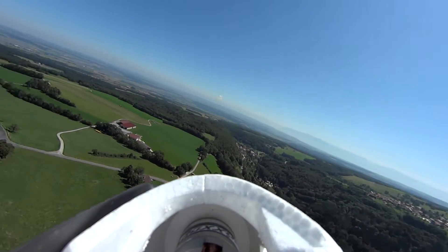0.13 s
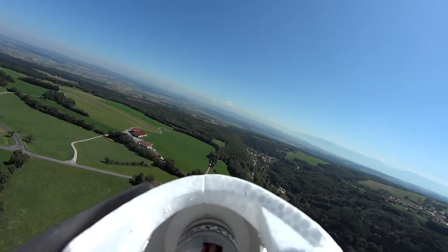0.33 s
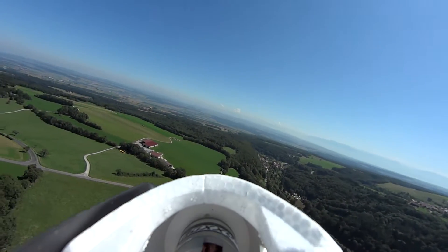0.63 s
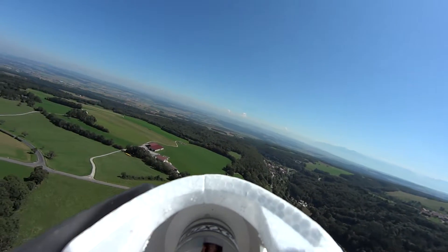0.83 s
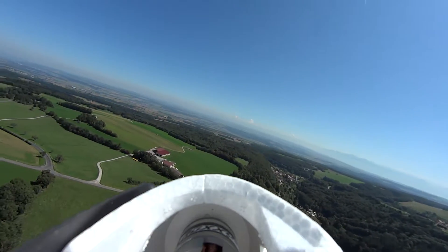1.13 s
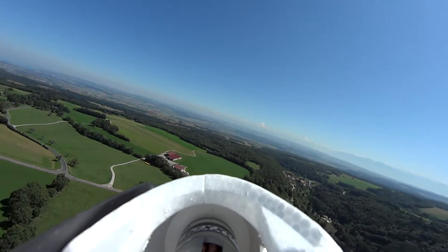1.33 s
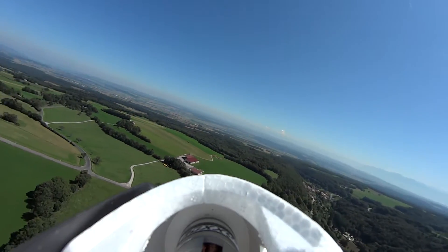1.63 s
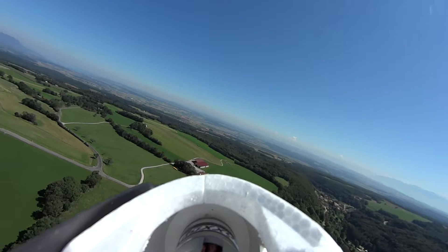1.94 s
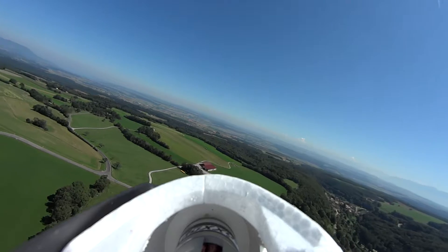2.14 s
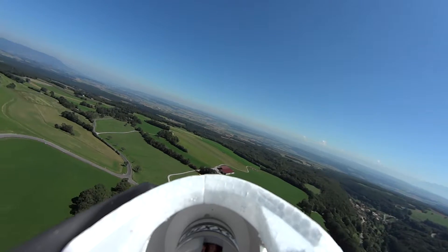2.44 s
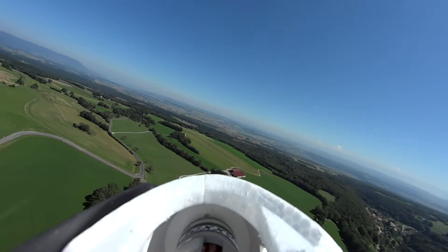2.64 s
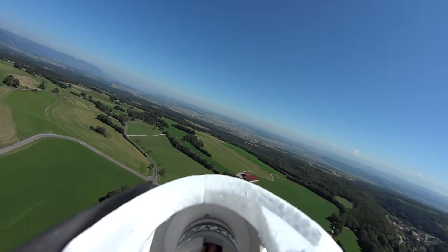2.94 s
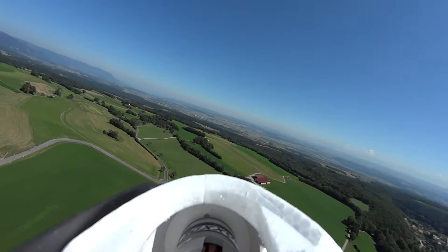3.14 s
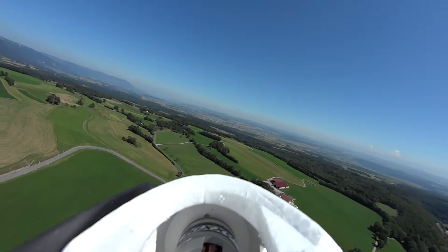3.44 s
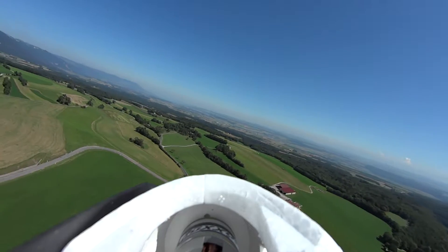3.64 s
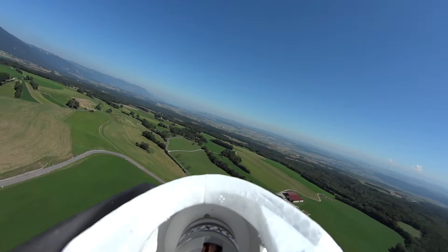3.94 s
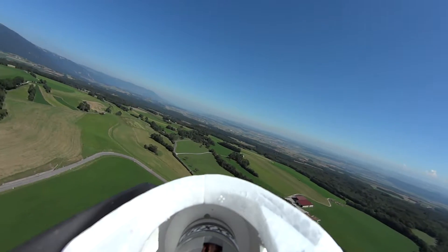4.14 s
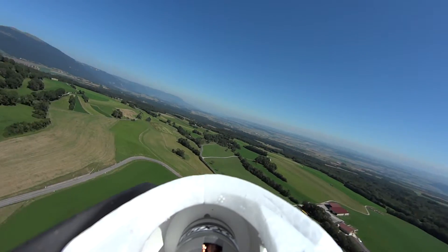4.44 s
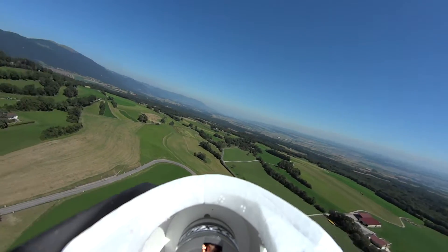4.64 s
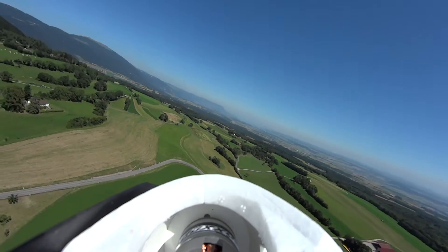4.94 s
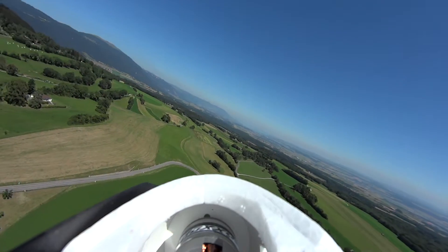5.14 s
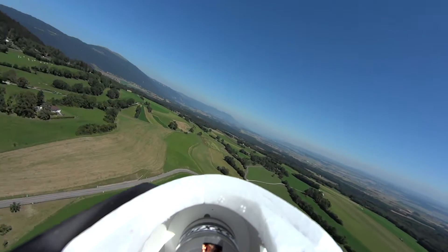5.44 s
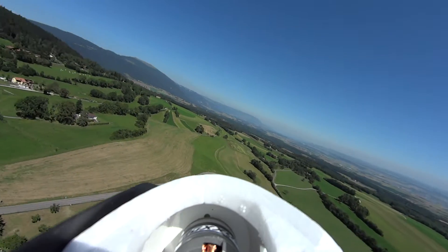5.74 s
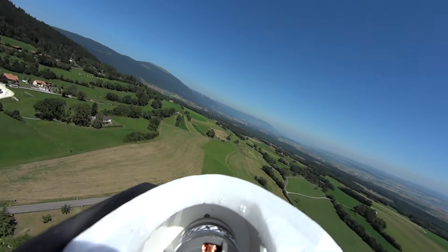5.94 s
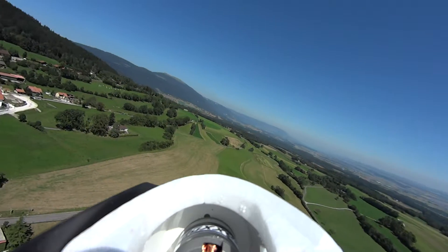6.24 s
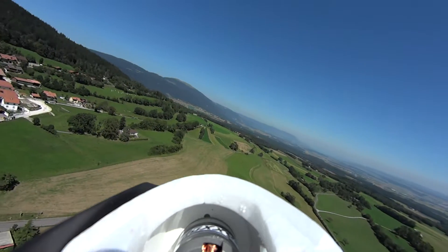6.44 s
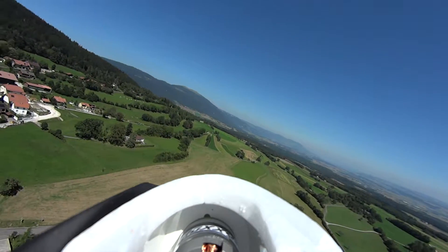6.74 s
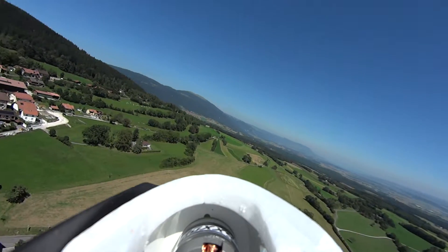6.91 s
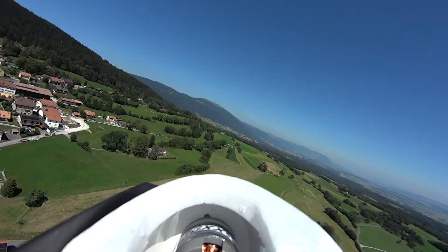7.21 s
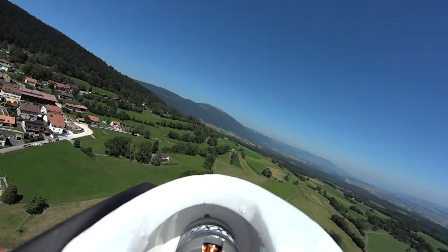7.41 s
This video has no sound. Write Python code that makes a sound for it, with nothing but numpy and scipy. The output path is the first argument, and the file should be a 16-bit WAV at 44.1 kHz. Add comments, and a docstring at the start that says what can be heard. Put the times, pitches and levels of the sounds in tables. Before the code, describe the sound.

For about seven and a half seconds there is only wind hitting a microphone on a gliding model aircraft, very close, loud and bass-heavy. Deep irregular thumps form an unbroken rumble, with a low churn above them, a fluttering muffled roar and a very thin, sputtering hiss. The left channel faces the stream and is fuller and brighter; the right is sheltered, duller and quieter. From 0 to 1.5 s the gusts are choppiest, with several hard overload ticks among faint crackle. The flow then steadies, dips briefly near 3.2 s, and surges again around 3.5 s with a few more ticks. Another lull comes near 4.9 s, clearer on the right. Buffeting continues unevenly, with scattered ticks around 5.6 to 5.9 s and 6.7 to 7.1 s. It thins near 7.3 s, ticks sharply at about 7.4 s, and swells again as it ends abruptly.

```python
"""On a gliding model aircraft, air rushes over the two microphone ports of a camera riding along.
Each port has its own turbulence, shaped from noise: deep buffeting, a low churn, a roar and a thin hiss.
The left port faces the stream; the right one is sheltered, duller and quieter.
High pressure crests overload the microphone with short snaps, a faint crackle and a few single ticks.
A limiter then holds the peaks of each channel, and the highest treble is cut away."""
import sys
import numpy as np
from scipy import signal
from scipy.fft import rfft, irfft, next_fast_len
from scipy.io import wavfile
from scipy.ndimage import uniform_filter1d, minimum_filter1d, map_coordinates

SR = 44100
rng = np.random.default_rng(int(sys.argv[2]) if len(sys.argv) > 2 else 0)


def log_audio(samples):
    """Write samples as a 16-bit WAV file to the path given in sys.argv[1]."""
    # one column per channel
    frames = np.atleast_2d(samples).T
    # limit to full scale, then quantise
    limited = np.clip(frames, -1, 1)
    pcm = np.round(limited * 32767).astype(np.int16)
    wavfile.write(sys.argv[1], SR, pcm)


N = 333837

# tone colour of the turbulence at each port, used for its shape inside each band:
# frequency_hz, density_db (per Hz)
LEFT_COLOUR = [(11, -8.5), (43, 0.6), (78, 0), (125, -6), (250, -13), (500, -23), (1000, -33.5),
               (1500, -42.5), (2100, -50), (2900, -55), (4400, -57), (7000, -68), (10000, -78.5)]
RIGHT_COLOUR = [(11, -11), (43, -3.5), (78, 0), (125, -7.5), (250, -16.5), (500, -30.5), (1000, -45),
                (1500, -55.5), (2100, -64.5), (2900, -66.5), (4400, -75.5), (7000, -85), (10000, -90)]
# eddies at each port, one row each for buffet, churn, roar and hiss:
# level_db (in the mean stream), follow_db_per_db (of airflow), drift_db (random)
LEFT_EDDIES = [(-7, 0.65, 0.32), (-16, 1, 0.07), (-26.5, 1, 0), (-49, 1.14, -0.04)]
RIGHT_EDDIES = [(-12, 0.93, .2), (-22, 1, .2), (-38.5, 0.99, .3), (-70, .9, .5)]
# airflow at the exposed left port, with gusts early on and lulls near 3.2, 4.9 and 7.3 s:
# time_s, flow_db (about its mean)
LEFT_FLOW = [(0.02, -0.0), (0.3, 0.3), (0.36, 3.7), (0.56, -0.9), (0.7, 3.6), (0.76, 0.4), (0.88, 2.4),
             (0.96, -1.9), (1.1, 1.4), (1.26, -1.1), (1.42, 1.1), (1.82, 0.5), (1.9, 2.0), (2.02, -2.1),
             (2.1, 0.6), (2.22, -0.8), (2.3, 1.5), (2.58, 0.2), (3.06, -0.8), (3.1, -0.1), (3.2, -3.3),
             (3.53, 1.6), (3.59, -1.2), (3.67, 1.7), (3.81, 0.1), (3.91, 1.0), (3.95, -1.0), (4.09, 0.9),
             (4.19, -0.3), (4.21, 1.4), (4.51, -1.1), (4.61, 1.5), (4.93, -2.9), (5.13, 0.2), (5.17, -1.6),
             (5.37, 0.6), (5.41, -2.7), (5.53, 0.7), (5.73, -0.9), (5.79, 0.4), (5.99, -1.2), (6.13, 0.5),
             (6.31, -0.7), (6.37, 0.5), (6.53, -1.6), (6.75, 1.5), (6.85, -1.3), (6.97, 1.6), (7.27, -3.5),
             (7.55, 3.7)]
# airflow at the sheltered right port, which swings wider: time_s, flow_db (about its mean)
RIGHT_FLOW = [(0.02, 6.1), (0.28, -2.3), (0.4, 4.4), (0.48, -0.7), (0.88, 0.6), (1.0, -2.4), (1.1, 2.3),
              (1.16, -1.6), (1.32, 3.0), (1.98, -2.0), (2.18, 1.3), (2.96, -1.6), (3.1, 1.8), (3.18, -1.6),
              (3.35, -2.2), (3.43, 2.5), (3.57, -2.5), (3.91, 1.9), (3.95, -0.4), (4.03, 2.1), (4.21, -1.7),
              (4.37, 3.6), (4.45, 0.1), (4.71, 3.5), (4.85, -5.5), (5.13, -0.2), (5.19, -5.2), (5.35, 1.5),
              (5.43, -1.7), (5.61, 2.3), (5.89, -0.5), (6.11, 0.8), (6.65, -2.1), (6.75, 0.6), (7.13, 1.7),
              (7.17, -3.3), (7.35, -3.6), (7.55, 4.4)]
# large eddies that make the buffeting thump or drop out briefly: centre_s, length_s, left_db, right_db
SWELLS = [(0.03, 0.05, 4.0, -1.5), (0.17, 0.05, 2.4, 2.5), (0.23, 0.05, -3.3, 1.8),
          (0.35, 0.05, -3.8, -1.4), (0.49, 0.05, 0.1, 4.0), (0.54, 0.05, 3.6, 2.2), (0.7, 0.05, -5.5, -0.4),
          (0.93, 0.07, 2.6, 1.3), (1.14, 0.05, 2.8, 0.3), (1.24, 0.05, 2.6, 1.4), (1.5, 0.05, 2.1, 0.1),
          (1.56, 0.05, -1.6, 4.4), (1.64, 0.05, 1.4, 3.2), (1.84, 0.05, 2.1, 1.3), (1.9, 0.05, -2.6, -0.5),
          (2.01, 0.07, 3.6, 0.6), (2.22, 0.07, 2.1, -2.7), (2.38, 0.05, -2.5, 1.2), (2.53, 0.05, 1.7, 3.5),
          (2.66, 0.07, -2.6, 1.5), (2.92, 0.07, 3.0, -3.9), (3.05, 0.05, 1.5, -6.9),
          (3.23, 0.05, -1.1, -4.5), (3.64, 0.07, -5.0, 1.9), (3.78, 0.07, 1.8, 1.5),
          (3.95, 0.05, 4.8, -0.5), (4.21, 0.05, -4.1, 3.0), (4.33, 0.05, 2.9, -0.7), (4.46, 0.1, 2.3, 2.8),
          (4.64, 0.05, -5.0, -1.2), (4.78, 0.05, -2.2, -0.3), (4.97, 0.05, -1.9, -3.6),
          (5.08, 0.05, 3.8, -1.5), (5.17, 0.05, 2.3, 2.3), (5.25, 0.05, -2.4, -2.3), (5.42, 0.1, 3.5, 1.2),
          (5.63, 0.05, 2.7, -3.8), (6.37, 0.15, -2.7, -0.8), (6.5, 0.05, -2.0, -2.1),
          (6.65, 0.05, 3.2, 1.8), (6.73, 0.05, -0.4, -3.9), (6.97, 0.05, -4.3, 1.2),
          (7.25, 0.07, -5.6, -3.5), (7.5, 0.05, -3.0, -3.3)]
# middling eddies that make the churn whoosh or thin out: centre_s, length_s, left_db, right_db
WHOOSHES = [(0.03, 0.05, -2.4, 0.7), (0.5, 0.07, -2.2, -1.2), (0.6, 0.05, 3.9, -0.1),
            (0.67, 0.05, -1.3, 4.8), (2.53, 0.05, 2.2, 2.6), (2.98, 0.05, 3.8, -0.2),
            (3.13, 0.1, -2.0, -0.6), (3.28, 0.1, 1.8, -0.6), (3.61, 0.1, -3.4, 0.5), (4.41, 0.07, 2.8, 0.5),
            (4.66, 0.05, 2.5, 1.3), (5.7, 0.05, 0.1, -4.1), (5.78, 0.07, -2.1, 1.3),
            (6.01, 0.05, -2.6, 0.6), (6.5, 0.1, -2.5, 0.9), (6.86, 0.07, 4.1, -3.0),
            (7.39, 0.05, 1.7, -2.8), (7.46, 0.05, -2.4, -2.8)]
# moments when the left roar is briefly louder, as in any uneven turbulence: centre_s
ROAR_LIFT_TIMES = [.232, .831, 1.13, 1.983, 2.951, 3.23, 3.694, 4.822, 5.954, 7.111]
# extra level of the left hiss, on top of what the airflow gives it: time_s, level_db
LEFT_HISS = [(0.02, -0.7), (0.12, 1.1), (0.46, -0.6), (0.6, 1.9), (0.7, -1.7), (0.82, 0.2), (1.82, -0.1),
             (1.9, -1.3), (2.02, 0.8), (2.3, -0.8), (3.24, 0.5), (3.39, -0.8), (4.17, 0.3), (4.37, -2.8),
             (4.49, -0.2), (4.85, -0.6), (4.99, 2.5), (5.09, -0.4), (6.03, 0.8), (6.21, -0.8), (6.55, 1.5),
             (6.61, -0.2), (7.43, 1.0), (7.55, -1.3)]
# single hard overload ticks: start_s, strength_db (relative to the common tick size), port (0 left, 1 right)
TICKS = [(0.07, -2.8, 1), (0.228, 7.8, 0), (0.39, 8.8, 0), (0.609, 7.8, 0), (0.627, 7.9, 0),
         (1.09, -3.2, 1), (1.217, 7.9, 0), (1.233, -10.0, 1), (1.321, -6.9, 1), (1.325, 7.2, 0),
         (1.341, 0.0, 1), (1.348, 8.9, 0), (1.519, -5.3, 1), (1.542, 7.6, 0), (2.425, 7.9, 0),
         (3.408, -7.2, 1), (3.692, 8.1, 0), (3.762, 7.9, 0), (4.098, 7.0, 0), (5.586, -9.6, 1),
         (5.645, -4.1, 1), (5.727, -1.5, 1), (5.79, -5.6, 1), (5.846, 8.2, 0), (6.682, 7.0, 0),
         (6.769, 8.0, 0), (6.917, -3.5, 1), (7.058, -1.3, 1), (7.095, -5.0, 1), (7.134, -6.4, 1),
         (7.416, 9.5, 0)]

BUFFET_HZ, CHURN_HZ, HISS_HZ = 150, 500, 2500  # top of the buffet, top of the churn, bottom of the hiss
TOP_HZ = 11100  # nothing is kept from here up
DRIFT_PER_S = 9  # random points a second in the drift of each eddy size
GUST_DB, GUSTS_PER_S = 0.08, 11  # gusts common to both ports
THUMP_DB, THUMPS_PER_S = 2.4, 45  # how deeply and quickly the buffeting breaks into thumps
SHARED = 0.2  # share of the buffeting power, before saturation, that both ports have in common
PORT_TOP = 1.9  # pressure at which the buffeting saturates a port (1 = full scale)
PATCH_DB = 1.2  # strength of the random patches in roar and hiss
LIFT_S, LIFT_DB = 0.012, 4  # width at half height, rise at the centre


def amp(db):
    """Turn decibels into a gain."""
    return 10 ** (np.asarray(db) / 20)


def unit(x):
    """Scale to an rms (average strength) of 1."""
    return x / np.sqrt(np.mean(x ** 2) + 1e-20)


def along(points, hz):
    """Join (Hz, value) points by straight lines on a log frequency axis."""
    f, v = np.transpose(points)
    return np.interp(np.log(hz + 1), np.log(f + 1), v)


def curve(rows):
    """Join (time, value) points by straight lines, giving one value per sample."""
    s, value = np.transpose(rows)
    return np.interp(np.arange(N) / SR, s, value)


def wobble(rate):
    """Draw a smooth random curve through `rate` random points a second."""
    points = rng.standard_normal(int(N * rate / SR) + 4)
    return map_coordinates(points, [np.arange(N) * rate / SR])


def bell(s, length):
    """Rise and fall smoothly around time s, `length` seconds wide at half height."""
    offset = 2 * (np.arange(N) / SR - s) / length
    return 0.5 ** np.minimum(offset ** 2, 20)


def filtered(x, response):
    """Multiply the spectrum of x by a response that depends on frequency."""
    m = next_fast_len(N + SR // 2)  # spare room at the end
    return irfft(rfft(x, m) * response(np.fft.rfftfreq(m, 1 / SR)), m)[..., :N]


def below(hz, edge_hz, order=8):
    """Share of power that a crossover passes under its edge."""
    return 1 / (1 + (hz / edge_hz) ** order)


def eddy_levels(flow_db, eddies):
    """Each size of eddy follows the airflow by its own power law and drifts a little by chance."""
    return [level_db + follow * flow_db + drift_db * wobble(DRIFT_PER_S)
            for level_db, follow, drift_db in eddies]


def passing_eddies(rows):
    """Each passing eddy lifts or lowers the level in a bell: dB at the left and right port."""
    return sum(np.outer([left_db, right_db], bell(s, length)) for s, length, left_db, right_db in rows)


def turbulence(colour, low_hz, high_hz, flutter_db):
    """One size range of eddies: fluttering noise, levelled to rms 1 over about a tenth of a second."""
    def response(hz):
        band_power = below(hz, high_hz) * (1 - below(hz, low_hz))
        return amp(along(colour, hz)) * np.sqrt(band_power)

    noise = unit(filtered(rng.standard_normal(N), response)) * amp(flutter_db)
    power = uniform_filter1d(noise ** 2, size=SR // 14)
    power = uniform_filter1d(power, size=SR // 14)
    return noise / np.sqrt(np.abs(power) + 1e-12)


def buffeting(level_db, colour, common):
    """The largest eddies push on the port in deep thumps; the pressure saturates smoothly."""
    own = turbulence(colour, 8.0, BUFFET_HZ, THUMP_DB * wobble(THUMPS_PER_S))
    swirl = np.sqrt(SHARED) * common + np.sqrt(1 - SHARED) * own
    push = amp(level_db) * swirl
    return push / (1 + (push / PORT_TOP) ** 4) ** (1 / 4)


def churning(level_db, colour, flutter_db):
    """Middling eddies churn between the buffeting and the roar."""
    return amp(level_db) * turbulence(colour, BUFFET_HZ, CHURN_HZ, 0.75 * flutter_db)


def roaring(level_db, colour, flutter_db):
    """Small eddies flutter quickly and blend into a roar."""
    return amp(level_db) * turbulence(colour, CHURN_HZ, HISS_HZ, flutter_db)


def hissing(level_db, colour, flutter_db, sputter_db):
    """The smallest eddies give a thin hiss that also sputters on its own."""
    spit_db = sputter_db * wobble(900) + 0.5 * wobble(25)
    return amp(level_db) * turbulence(colour, HISS_HZ, SR / 2, 0.5 * flutter_db + spit_db)


def patchy(x, depth_db):
    """Eddies of neighbouring sizes come and go: random gain in patches of pitch and time."""
    spectrum = signal.stft(x, nperseg=512)[2]
    # smoothing spreads each patch over a few hundred hertz and some tens of milliseconds
    field = uniform_filter1d(rng.standard_normal(spectrum.shape), size=7, axis=0)
    field = uniform_filter1d(field, size=7, axis=1)
    gain = unit(amp(depth_db * unit(field)))
    return signal.istft(spectrum * gain, nperseg=512)[1][:N]


def port(levels, colour, common, lumps_db, bursts_db, sputter_db):
    """Pressure at one port: large eddies buffet it, middling ones churn, small ones roar and hiss."""
    buffet_db, churn_db, roar_db, hiss_db = levels
    # smaller eddies come in bursts, so churn, roar and hiss partly flutter together
    flutter_db = lumps_db * wobble(70) + bursts_db * wobble(450)
    buffet = buffeting(buffet_db, colour, common)
    churn = churning(churn_db, colour, flutter_db)
    roar = roaring(roar_db, colour, flutter_db)
    hiss = hissing(hiss_db, colour, flutter_db, sputter_db)
    return buffet + churn + patchy(roar + hiss, PATCH_DB)


def snaps(times, sizes):
    """Overload snaps: the signal drops within a few samples and recovers over some two milliseconds."""
    t = np.arange(SR // 100) / SR
    drop = -(1 - np.exp(-t / 0.00004)) * np.exp(-t / 0.002)
    impulses = np.bincount(times, sizes, N)[:N]
    return signal.fftconvolve(impulses, drop)[:N]


def crackle(pressure, overload, size_db):
    """High pressure crests overload the microphone, mostly slightly, now and then hard."""
    crests = signal.find_peaks(pressure, height=overload, distance=SR // 300)[0]
    strength = rng.random(N)[crests] ** 2  # squaring makes small snaps the most common
    return snaps(crests, amp(size_db) * strength)


def ticks(size_db):
    """A few hard overloads stand out as single ticks, each at one port."""
    s, strength_db, side = np.transpose(TICKS)
    times = np.round(s * SR).astype(int)
    sizes = amp(strength_db + size_db)
    return np.array([snaps(times, sizes * (side == k)) for k in range(2)])


def roar_lifts():
    """Brief lifts of the left roar, as in any uneven turbulence: dB on top of its level."""
    return LIFT_DB * sum(bell(s, LIFT_S) for s in ROAR_LIFT_TIMES)


def scene():
    """The stream drives the exposed left port and the duller, quieter right port; large eddies span both."""
    gust_db = GUST_DB * wobble(GUSTS_PER_S)
    common = turbulence(LEFT_COLOUR, 5.7, BUFFET_HZ, 0)
    left_swell_db, right_swell_db = passing_eddies(SWELLS)
    left_whoosh_db, right_whoosh_db = passing_eddies(WHOOSHES)
    left_flow_db, right_flow_db = curve(LEFT_FLOW), curve(RIGHT_FLOW)

    buffet_db, churn_db, roar_db, hiss_db = eddy_levels(left_flow_db + gust_db, LEFT_EDDIES)
    levels = (buffet_db + left_swell_db, churn_db + left_whoosh_db,
              roar_db + roar_lifts(), hiss_db + curve(LEFT_HISS))
    left = port(levels, LEFT_COLOUR, common, lumps_db=0.5, bursts_db=2.5, sputter_db=3.0)

    buffet_db, churn_db, roar_db, hiss_db = eddy_levels(right_flow_db + gust_db, RIGHT_EDDIES)
    levels = buffet_db + right_swell_db, churn_db + right_whoosh_db, roar_db, hiss_db
    right = port(levels, RIGHT_COLOUR, common, lumps_db=1.0, bursts_db=2.5, sputter_db=2.5)

    # the left crackle also grows and fades with the airflow
    left_snaps = crackle(left, overload=0.5, size_db=-19.5) * amp(left_flow_db)
    right_snaps = crackle(right, overload=0.45, size_db=-38)
    return np.array([left + left_snaps, right + right_snaps]) + ticks(size_db=-27)


def limiter(x, ceiling, hold, ramp):
    """The gain eases down just ahead of each peak, holds briefly and returns (hold, ramp in samples)."""
    knee = 10  # higher bends more sharply at the ceiling
    needed = (1 + np.abs(x / ceiling) ** knee) ** (-1 / knee)
    held = minimum_filter1d(needed, hold)
    return x * uniform_filter1d(held, ramp)


def record(dry):
    """The camera limits each channel on its own and keeps nothing above its band limit."""
    limited = limiter(dry, ceiling=1, hold=SR // 300, ramp=SR // 380)
    return filtered(limited, lambda hz: hz < TOP_HZ)


dry = scene()
out = record(dry)
log_audio(out)
```